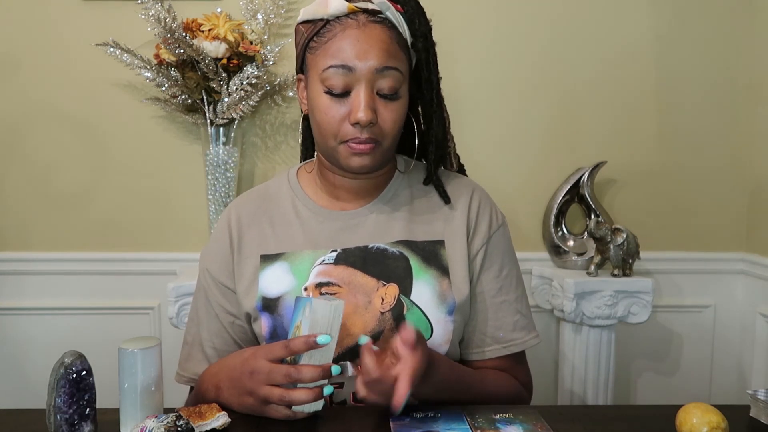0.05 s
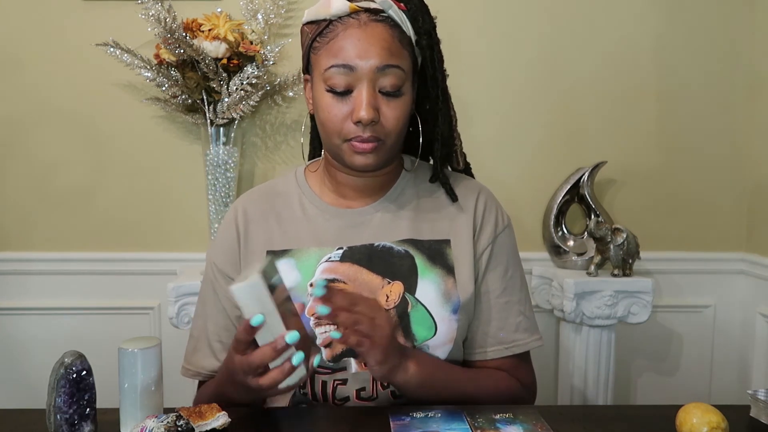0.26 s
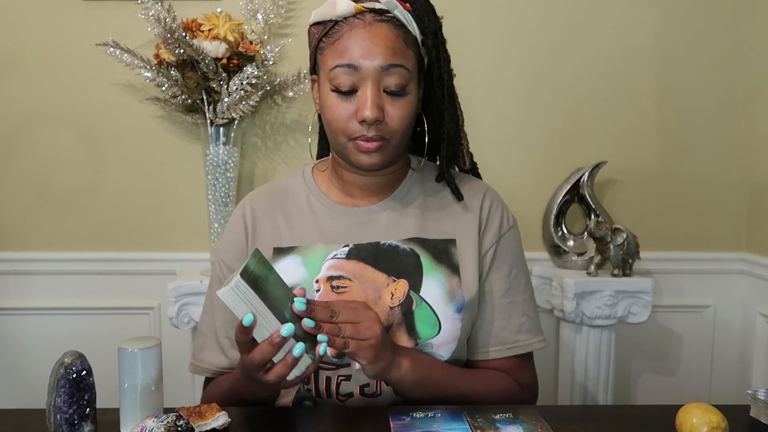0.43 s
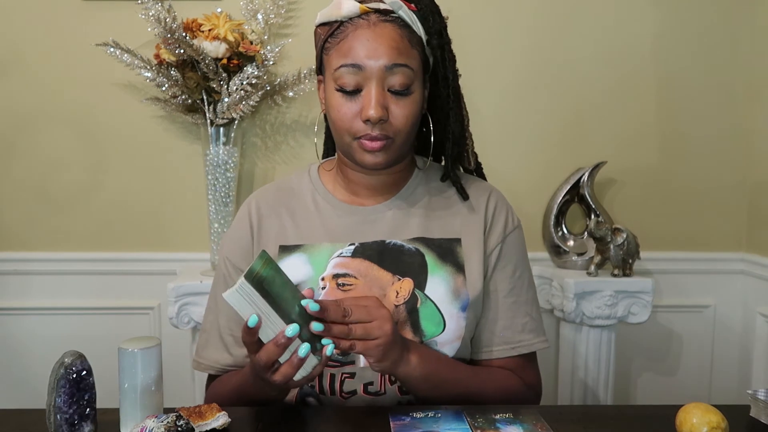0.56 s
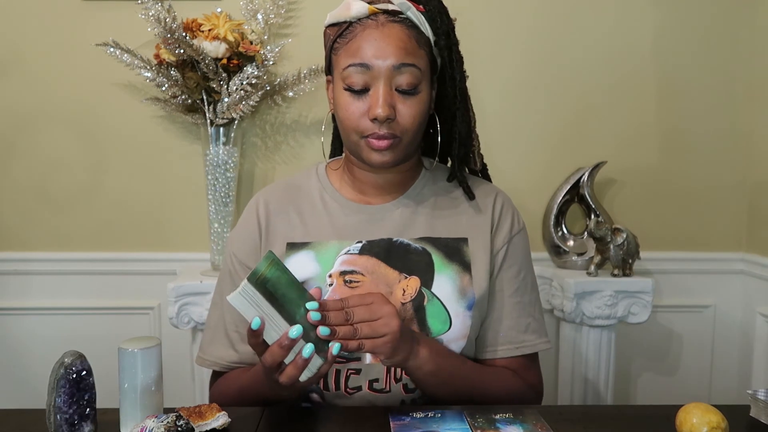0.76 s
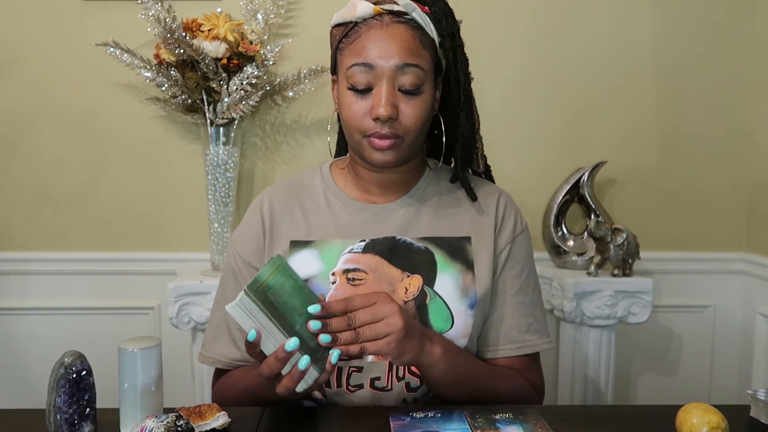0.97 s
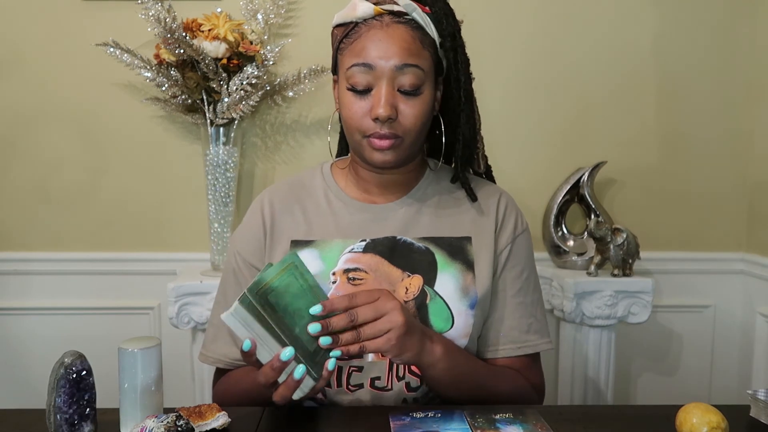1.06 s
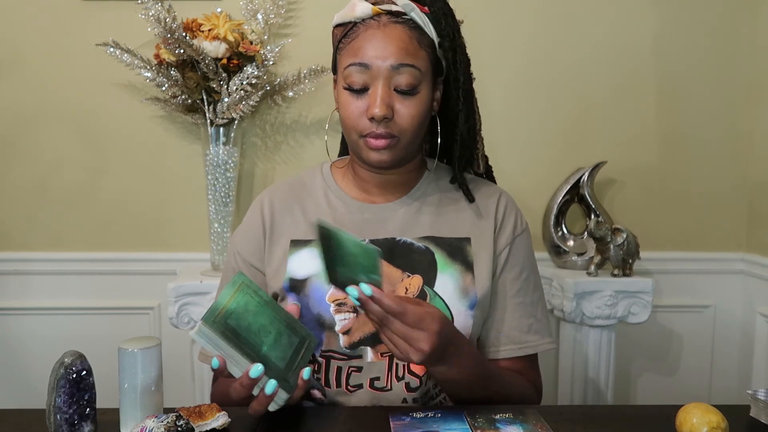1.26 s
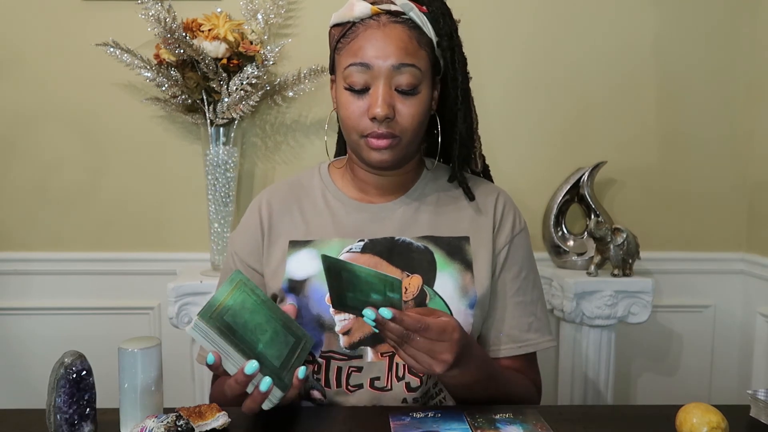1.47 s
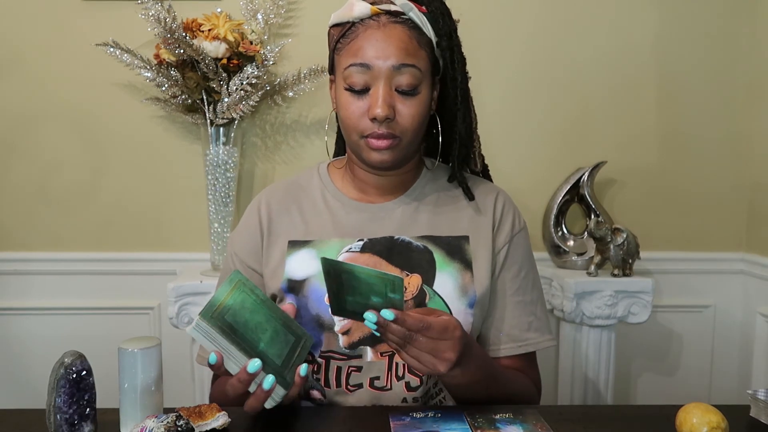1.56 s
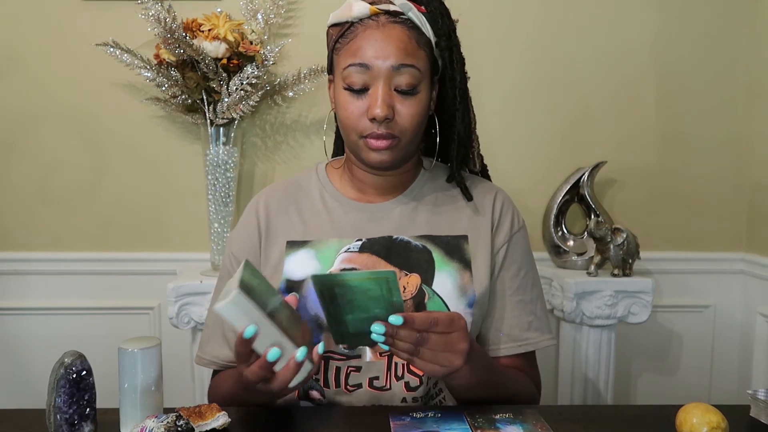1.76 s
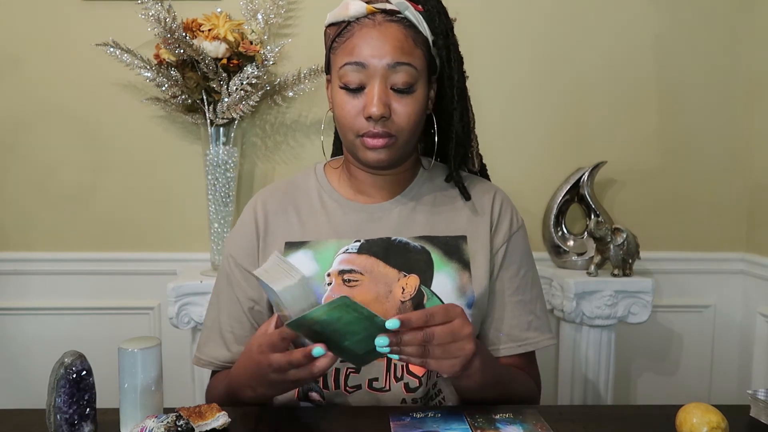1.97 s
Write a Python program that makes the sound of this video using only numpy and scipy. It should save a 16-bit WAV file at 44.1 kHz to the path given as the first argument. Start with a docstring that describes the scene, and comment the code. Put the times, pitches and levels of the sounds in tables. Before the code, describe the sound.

One loud, crisp card snap after soft handling of a deck in a quiet, humming room

```python
"""Card snapped from a deck

A stiff card scrapes out over its neighbour in a hand-held deck, bends, and snaps free in one sharp click.
The click is one impulse spread by bending waves; the scrape is noise and tiny slips shaped in pitch and level.
Before that, fingers and nails touch the deck softly: short noise pats and ringing ticks.
The table and walls of a small room answer, over a low mains hum, a wavering drone and faint air noise.
Direct card and finger sounds are the same in both ears; the room and the air differ between them."""
import sys
import numpy as np
from scipy import signal
from scipy.fft import rfft, irfft, next_fast_len
from scipy.io import wavfile

SR = 44100
rng = np.random.default_rng(int(sys.argv[2]) if len(sys.argv) > 2 else 0)


def materialize(psi):
    """Save the field psi as 16-bit PCM at rate SR to the path in sys.argv[1].

    A 1-D psi becomes a single channel; in a 2-D psi each row is a channel.
    """
    bounded = np.clip(np.atleast_2d(psi).T, -1, 1)
    quanta = np.round(bounded * 32767).astype(np.int16)
    wavfile.write(sys.argv[1], SR, quanta)


N = 88376  # length of the scene [samples]

# The snap: the card's edge slips off the deck
SNAP_S, SNAP_DB = 1.3101, 0
# tone of the snap toward the microphone (frequency [Hz], level [dB])
SNAP_COLOUR = [(25, -10.5), (60, 8.5), (120, 15.5), (260, 22), (480, 21), (720, 13), (1080, 18.5),
               (1330, 5), (1800, 23), (2550, 25), (3300, 20.5), (4150, 16.5), (4900, -1), (8700, -8.5),
               (10500, -18), (12000, -26), (15000, -26)]
# tone of the snap as it spreads into the room (frequency [Hz], level [dB])
SNAP_SPREAD = [(40, -5), (130, 6.5), (250, 17.5), (350, 7.5), (480, 13), (720, -2), (1060, 9), (1330, 4.5),
               (1720, 15), (2050, 0.5), (2400, 3.5), (3800, -12), (5000, -6), (7000, -15.5), (11000, -33)]
BEND_LAG_S = 0.00125  # bending waves arrive this late at 1 kHz; higher ones run faster
# first reflections, table then walls (delay [s], gain [dB], dull above [Hz])
ECHOES = [(.00172, -10, 4400), (.0069, -19.5, 4230), (.0078, -20, 2990), (.0096, -15.5, 3500),
          (0.0118, -27.5, 2480), (.0161, -27, 3000)]
# resonances the snap leaves ringing in the room (frequency [Hz], level [dB], time to fall 60 dB [s])
RINGS = [(245, -32.5, 0.22), (473, -37.5, .42), (980, -30, 0.17), (1090, -46, 0.98), (1530, -56.5, .5),
         (1674, -65, .4), (1810, -47, .5), (2250, -64, 0.38), (2480, -49.5, 0.37), (3960, -64.5, .25)]
RING_WIDTH_HZ = 8  # each resonance is a cluster of close modes

# the card sliding out (time [s], level [dB], ringing pitch of the card [Hz])
SLIDE = [(1.07, -79, 3300), (1.104, -58, 3400), (1.165, -56, 3300), (1.212, -47.5, 2300),
         (1.219, -43.5, 2300), (1.251, -37.5, 3050), (1.275, -38, 3100), (1.305, -36, 2700),
         (1.312, -22, 2700), (1.313, -89, 2700)]
# tone of card rubbing on card (frequency [Hz], level [dB per Hz])
RUB_COLOUR = [(100, -12.5), (250, -6), (700, -7), (1000, -2.5), (1280, -8), (2100, 2), (3000, -1),
              (3900, 2), (5300, -14), (7700, -18.5), (10500, -30), (15000, -29)]
SLIPS_PER_S, SLIP_SHARE = 900, 0.54  # average rate; share of slips in the power, the rest is smooth noise
CARD_RING_DB, CARD_WIDTH_HZ = -4, 470  # the card's resonance over the friction
# short brushes of card on card (time [s], level [dB], rise [s], fall [s])
BRUSHES = [(.08, -66, .05, 0.056), (.35, -64, 0.032, 0.085), (.43, -61, .008, 0.022),
           (.93, -66.5, 0.029, 0.025), (1.041, -48.5, 0.012, 0.026), (1.112, -51, 0.0066, .02),
           (1.187, -48, 0.02, .014), (1.217, -41.5, .003, .012)]
FLEX_DB, FLEX_RISE_S = -48.5, 0.036  # the card bowing just before it lets go
# tone of the bowing card (frequency [Hz], level [dB per Hz])
FLEX_COLOUR = [(50, -25), (200, 1), (450, -0.5), (700, -5.5), (1050, 3), (1400, -13), (3000, -35.5)]

# fingers meeting the deck (time [s], level [dB], time to fall 60 dB [s])
TOUCHES = [(0.2892, -41.5, 0.034), (0.2929, -47.5, 0.08), (0.304, -49.5, 0.1), (.319, -51, 0.075),
           (0.423, -50.5, .04)]
# tone of the finger pats (frequency [Hz], level [dB per Hz])
TOUCH_COLOUR = [(80, 1), (250, 1.5), (700, 2.5), (950, -3.5), (1500, -1.5), (2100, -1), (3200, -11),
                (5000, -23.5), (8300, -25), (14000, -44)]
# fingernail ticks (time [s], level [dB])
TICKS = [(0.7919, -42.5), (0.897, -51)]
TICK_HZ, TICK_WIDTH_HZ, TICK_T60_S = 2633, 180, 0.025

# time the room takes to fall 60 dB (frequency [Hz], time [s])
ROOM_T60 = [(100, 0.2), (300, 0.56), (1000, 0.63), (1700, 0.69), (3000, 0.81), (6000, 0.47), (11000, 0.24)]
# the room's left-right difference against its shared part (frequency [Hz], level [dB])
ROOM_SIDE = [(100, -34), (400, -18.5), (1000, -22), (2400, -15), (4500, -4), (8000, 7.5), (13000, 15)]
ROOM_DELAY_S, ROOM_BUILD_S = 0.0032, 0.001
SNAP_ROOM_DB, HANDLING_ROOM_DB = -0.5, -9.5

# mains hum lines (frequency [Hz], level [dB rms])
HUM = [(120, -46.5), (240, -69)]
# level of the drone (time [s], level [dB])
DRONE_LEVEL = [(.02, -65), (.17, -55), (.38, -61), (.55, -71), (1.45, -66), (1.68, -57), (2, -61)]
DRONE_HZ, DRONE_WIDTH_HZ = 412, 37
# tone of the air noise (frequency [Hz], level [dB per Hz])
AIR_COLOUR = [(20, -33.5), (50, -23), (75, -24), (115, -15.5), (160, -21.5), (300, -23), (410, -24.5),
              (520, -28), (1000, -31), (2000, -35.5), (2800, -38), (5000, -43), (9000, -51.5), (12000, -51),
              (15000, -50.5)]
AIR_DB = -52
# how alike the air noise is left and right (frequency [Hz], likeness [0 to 1])
AIR_ALIKE = [(60, 1), (130, 0.58), (280, 0.046), (600, 0), (10000, 0.005)]

# the recorder's top end (frequency [Hz], level [dB])
TREBLE = [(9000, 0), (12000, -4), (15000, -11.5)]
TOP_HZ = 15300  # band limit
CEILING, KNEE = 1, 4  # highest peak; a larger knee bends later and harder


def snap():
    """One impulse; bending waves run faster at high pitch, so it becomes a fast falling chirp."""
    blow = amp(SNAP_DB) * signal.unit_impulse(N, round(SNAP_S * SR))

    def bending(hz):
        """Delay each pitch by the travel time of its bending wave."""
        return np.exp(-4j * np.pi * BEND_LAG_S * np.sqrt(1000 * hz))

    def paths(hz):
        """Add delayed, duller copies for the reflections to the direct sound."""
        total = 1
        for delay_s, db, dull_hz in ECHOES:
            dulling = np.sqrt(1 + (hz / dull_hz) ** 6)
            total = total + amp(db) * np.exp(-2j * np.pi * hz * delay_s) / dulling
        return total

    click = filtered(blow, lambda hz: causal(SNAP_COLOUR, hz) * bending(hz) * paths(hz))
    spread = filtered(blow, lambda hz: causal(SNAP_SPREAD, hz))
    ring = 0
    for hz, db, t60 in RINGS:
        # as for a sine wave: dB is the peak level, rms is lower by sqrt(2)
        tone = narrow(hz, RING_WIDTH_HZ) / np.sqrt(2)
        ring = ring + amp(db) * struck(SNAP_S, t60, attack=0.0044) * tone
    return click + ring + amp(SNAP_ROOM_DB) * room(spread)


def scrape():
    """Tiny slips of card on card: a few brushes, then the pull that swells and bows the card up to the snap."""
    t = clock()
    times, level_db, pitch_hz = np.transpose(SLIDE)

    # friction: random slips and smooth noise, with the card ringing along
    slips = unit(rng.standard_normal(N) * (rng.random(N) < SLIPS_PER_S / SR))
    rough = np.sqrt(SLIP_SHARE) * slips
    smooth = np.sqrt(1 - SLIP_SHARE) * rng.standard_normal(N)
    card_ring = narrow(np.interp(t, times, pitch_hz), CARD_WIDTH_HZ)
    friction = unit(coloured(rough + smooth, RUB_COLOUR) + amp(CARD_RING_DB) * card_ring)

    # silent outside the listed times
    pull = amp(np.interp(t, times, level_db, left=-np.inf, right=-np.inf))
    brushes = 0
    for start, db, rise, fall in BRUSHES:
        width = np.where(t < start, rise, fall)
        brushes = brushes + amp(db) * np.exp(-2 * ((t - start) / width) ** 2)

    # the bowing grows toward the snap and stops there
    swell = np.exp(-abs(t - SNAP_S) / FLEX_RISE_S) * (t < SNAP_S)
    flex = coloured(rng.standard_normal(N), FLEX_COLOUR) * swell
    return friction * np.hypot(pull, brushes) + amp(FLEX_DB) * flex


def fingers():
    """Soft pats are dying noise bursts; nail ticks are short ringing tones."""
    touch = sum(amp(db) * struck(s, t60, attack=0.00082) for s, db, t60 in TOUCHES)
    pats = coloured(rng.standard_normal(N), TOUCH_COLOUR) * touch
    ticks = 0
    for start, db in TICKS:
        ring = narrow(TICK_HZ, TICK_WIDTH_HZ)
        ticks = ticks + amp(db) * struck(start, TICK_T60_S, attack=0.001) * ring
    return pats + ticks


def room(x):
    """Many blurred reflections: stereo noise that dies away at its own pace for each pitch."""
    hz, t, z = signal.stft(rng.standard_normal((2, SR)), SR, nperseg=256)
    decay = fade(t, along(ROOM_T60, hz)[:, None])
    tail = signal.istft(z * decay, SR, nperseg=256)[1]
    age = np.maximum(np.arange(tail.shape[1]) / SR - ROOM_DELAY_S, 0)
    tail = tail * (1 - np.exp(-age / ROOM_BUILD_S))
    tail = tail / np.linalg.norm(tail[0])
    mid, side = signal.fftconvolve(x[None], tail, axes=1)[:, :N]
    side = filtered(side, lambda f: amp(along(ROOM_SIDE, f)))
    return np.array([mid + side, mid - side])


def hum():
    """Steady mains hum: pure tones, the same in both ears."""
    total = 0
    for hz, db in HUM:
        tone = np.sin(2 * np.pi * (hz * clock() + rng.random()))
        total = total + amp(db) * np.sqrt(2) * tone  # sqrt(2) brings a sine to rms 1
    return total


def drone():
    """A faint wavering drone: a narrow band of noise, separate in each ear."""
    level = amp(np.interp(clock(), *np.transpose(DRONE_LEVEL)))
    return level * np.array([narrow(DRONE_HZ, DRONE_WIDTH_HZ) for ear in range(2)])


def air():
    """Air noise, alike in both ears in the deep bass and unlike above."""
    def mid_and_side(hz):
        """Split the noise so that left and right match as much as asked."""
        turn = np.arccos(np.clip(along(AIR_ALIKE, hz), -1, 1)) / 2
        return amp(along(AIR_COLOUR, hz)) * [np.cos(turn), np.sin(turn)]

    mid, side = filtered(rng.standard_normal((2, N)), mid_and_side)
    return amp(AIR_DB) * unit(np.array([mid + side, mid - side]))


def amp(db):
    """Decibels to gain."""
    return 10 ** (np.asarray(db) / 20)


def unit(x):
    """Scale to rms 1."""
    return x / np.sqrt(np.mean(x ** 2) + 1e-20)


def along(points, hz):
    """Read (frequency, value) points between the rows on a log axis."""
    f, v = np.transpose(points)
    return np.interp(np.log(hz + 1), np.log(f + 1), v)


def clock():
    """The time of every sample [s]."""
    return np.arange(N) / SR


def filtered(x, response):
    """Multiply the spectrum of x by a response of frequency."""
    m = 2 * next_fast_len(N)
    return irfft(rfft(x, m) * response(np.fft.rfftfreq(m, 1 / SR)), m)[..., :N]


def causal(points, hz):
    """A response with this colour that starts at the blow, never before it."""
    # fold the spectrum of the log spectrum forward in time (minimum phase)
    cepstrum = irfft(np.log(amp(along(points, hz))))
    half = len(cepstrum) // 2
    return np.exp(rfft(np.r_[cepstrum[0], 2 * cepstrum[1:half], np.zeros(half)]))


def coloured(x, points):
    """Give x this spectrum, at rms 1."""
    return unit(filtered(x, lambda hz: amp(along(points, hz))))


def fade(age, t60):
    """Exponential decay by 60 dB in t60 seconds."""
    return np.exp(-np.log(1000) * age / t60)


def struck(start, t60, attack):
    """Loudness of a struck thing: quick rise at start, then decay."""
    age = np.maximum(clock() - start, 0)
    return (1 - np.exp(-age / attack)) * fade(age, t60)


def narrow(hz, width_hz):
    """A fuzzy tone of rms 1, reaching about width_hz either side of a fixed or moving pitch."""
    a, b = filtered(rng.standard_normal((2, N)), lambda f: 1 / np.sqrt(1 + (f / width_hz) ** 4))
    phase = 2 * np.pi * np.cumsum(hz * np.ones(N)) / SR
    return unit(a * np.cos(phase) + b * np.sin(phase))


def scene():
    """Snap and handling in the humming room."""
    handling = scrape() + fingers()
    handling_room = amp(HANDLING_ROOM_DB) * room(handling)
    background = hum() + drone() + air()
    return snap() + handling + handling_room + background


def record(dry):
    """The recorder rounds off the highest peaks, dulls the treble and cuts steeply at its band limit."""
    rounded = dry / (1 + abs(dry / CEILING) ** KNEE) ** (1 / KNEE)
    return filtered(rounded, lambda hz: amp(along(TREBLE, hz)) / np.sqrt(1 + (hz / TOP_HZ) ** 120))


dry = scene()
out = record(dry)
materialize(out)
```